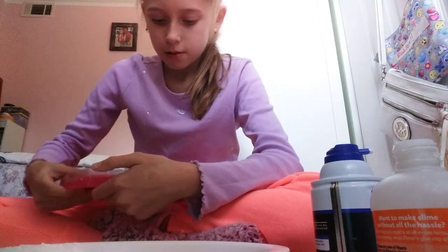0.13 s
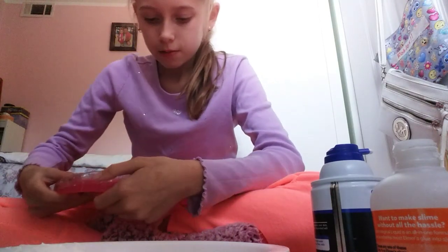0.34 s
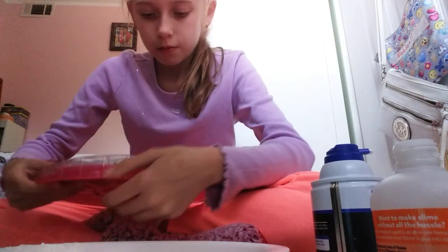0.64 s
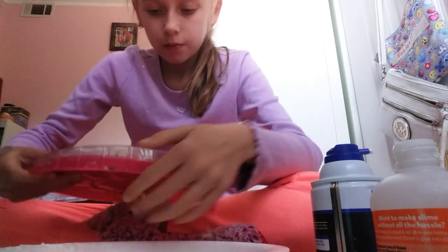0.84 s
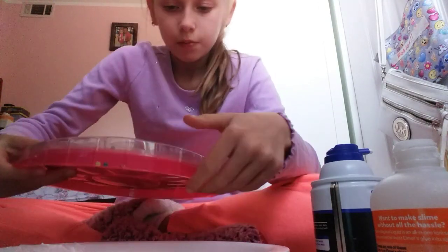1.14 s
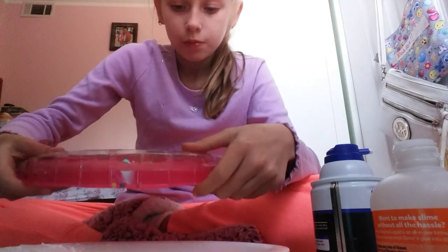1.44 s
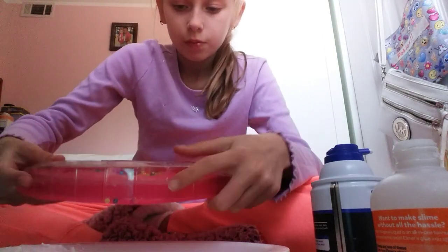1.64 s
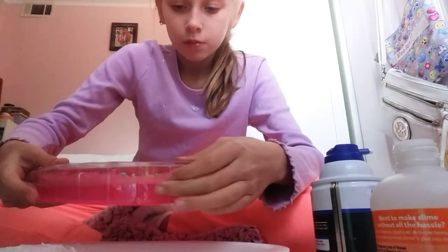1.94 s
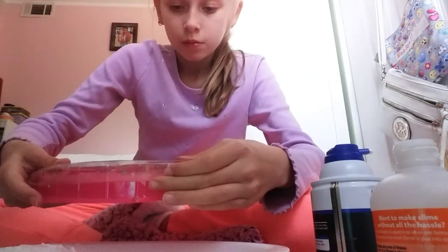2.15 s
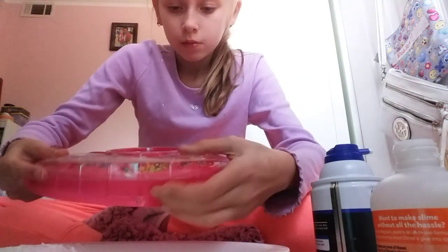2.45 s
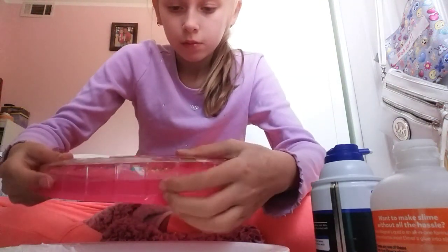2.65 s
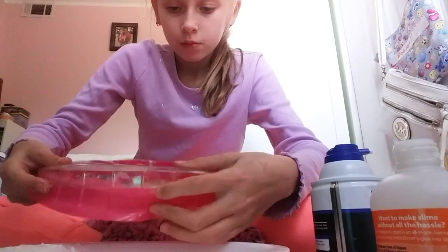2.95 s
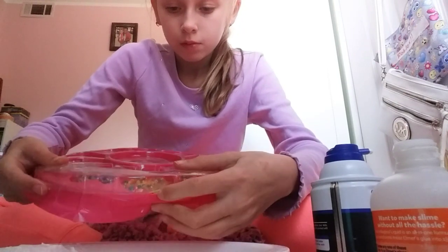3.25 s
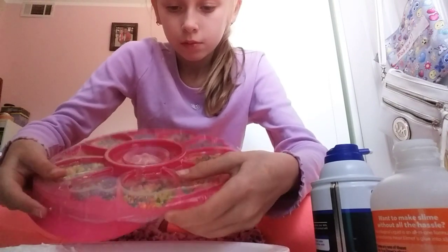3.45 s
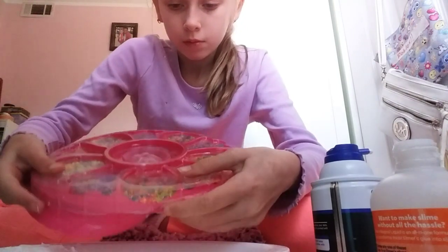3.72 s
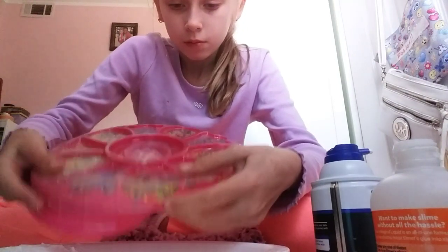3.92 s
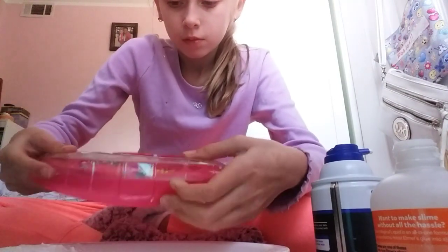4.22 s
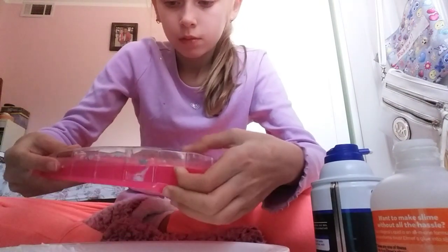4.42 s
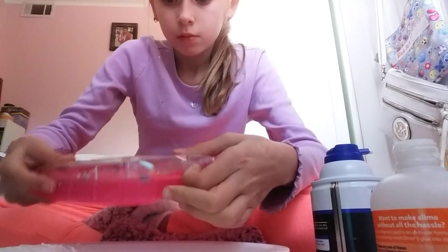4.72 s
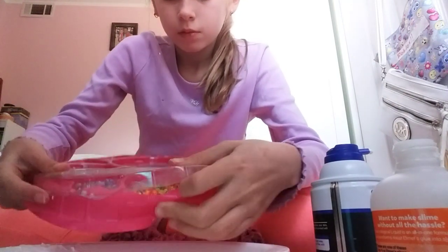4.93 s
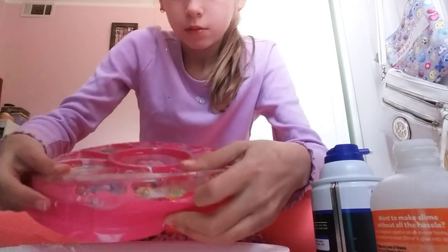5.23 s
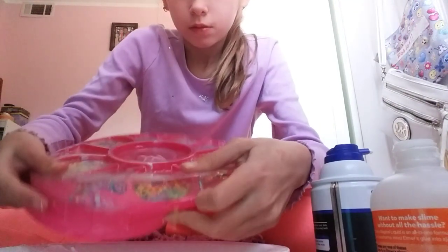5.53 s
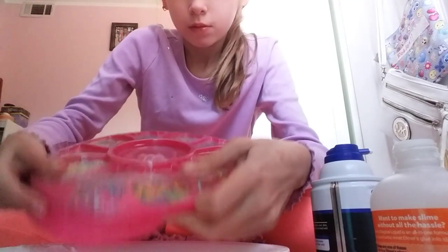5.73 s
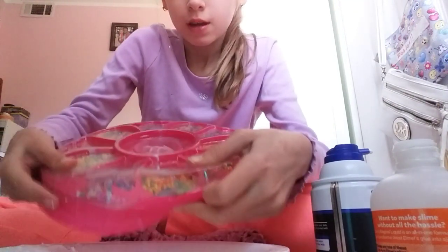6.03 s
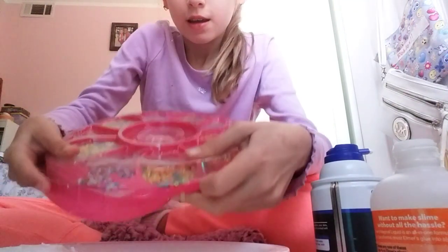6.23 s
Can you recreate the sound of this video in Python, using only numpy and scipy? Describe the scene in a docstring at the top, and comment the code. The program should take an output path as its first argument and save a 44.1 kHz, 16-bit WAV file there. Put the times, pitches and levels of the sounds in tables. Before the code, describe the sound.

Irregular hollow plastic knocks and sharp ticks, pattering craft beads and brief lid creaks, building to one loud snap in a small quiet bedroom.

```python
"""The shell of a round plastic compartment case snaps and creaks as two hands turn, squeeze and tilt it.
Each snap is a chatter of contacts: the contacts excite damped shell modes (body) and noise puffs (tick).
Creaks are stick-slip click trains; small beads patter as random impacts, loose or in heaps; palms thud.
Faint single ticks come from small beads or weak contacts of the case.
A bedroom adds diffuse echoes, and a wavering mains hum with coloured room noise lies below."""
import sys
import numpy as np
from scipy import signal
from scipy.fft import rfft, irfft
from scipy.io import wavfile

SR = 44100
rng = np.random.default_rng(int(sys.argv[2]) if len(sys.argv) > 2 else 0)


def log_audio(samples):
    """Write samples as a 16-bit WAV file to the path given in sys.argv[1]."""
    # one column per channel
    frames = np.atleast_2d(samples).T
    # limit to full scale, then quantise
    limited = np.clip(frames, -1, 1)
    pcm = np.round(limited * 32767).astype(np.int16)
    wavfile.write(sys.argv[1], SR, pcm)


N = 281049

# Hum, with the room noise tied to it, sinking after the loudest snap: (time [s], level [dB])
HUM_LEVEL = [(0, -54.5), (5.02, -54), (5.12, -57), (5.4, -62), (6.37, -62)]
# Spectral shape of the room noise: (frequency [Hz], level [dB])
ROOM_NOISE_SPECTRUM = [(25, -27), (50, 2), (90, 4.5), (160, 3), (300, -3), (640, -14), (1100, -16),
                       (2200, -36), (4000, -26), (8800, -25), (10500, -32.5), (16000, -29)]
# Lowest modes of the hand-damped case: (frequency [Hz], level [dB])
THUD_MODES = [(170, -8), (235, 1.5), (320, 2.5)]
# Modes of the hand-damped shell: (frequency [Hz], level [dB])
BODY_MODES = [(400, -15), (510, -7), (600, -3.5), (650, -0.5), (730, -6), (920, 2), (990, 2.5), (1070, 1.5),
              (1220, 5), (1390, 3), (1520, 1), (1650, -3.5), (1860, -4.5), (2250, -15), (2650, -15)]
# Spectral shape of a dry tick of plastic on plastic: (frequency [Hz], level [dB])
TICK_SPECTRUM = [(1060, -19), (1800, -6), (2010, -10), (2470, -7.5), (3050, -8.5), (3540, -2), (5730, -2),
                 (6230, -3), (7230, -7.5), (8950, 1), (10800, -18), (12700, -8.5), (14900, -10),
                 (15800, 2.5), (16500, -56)]
# Dull thuds of the palms on the base: (time [s], click level [dB])
PALM_THUDS = [(0.095, -46.5), (0.186, -42), (0.206, -46), (0.233, -39), (0.302, -45.5), (1.828, -45.5),
              (1.99, -40), (2.34, -41), (2.48, -34.5), (2.967, -37), (3.409, -44), (4.435, -41.5),
              (4.565, -40), (4.856, -27), (5.016, -39.5)]
# Faint single ticks, from small beads or weak contacts of the case: (time [s], click level [dB])
FAINT_TICKS = [(0.5693, -34.5), (0.62, -48), (0.64, -51), (1.956, -38.5), (2.0492, -45), (2.144, -44.5),
               (2.1657, -42.5), (2.2114, -39), (2.4394, -36), (2.698, -32), (2.757, -30.5), (2.7789, -32),
               (2.7923, -33), (2.8098, -32), (3.026, -29), (3.0458, -35.5), (3.2204, -52), (3.603, -31),
               (3.613, -32.5), (3.627, -30), (3.837, -34), (3.848, -34), (3.9455, -39), (4.8272, -31),
               (5.131, -30), (5.1738, -34), (5.21, -34), (5.2903, -47), (5.526, -29), (5.5613, -33.5),
               (5.612, -45), (5.6713, -41.5), (5.738, -43), (5.845, -29.5), (5.919, -34), (5.9854, -40),
               (6.021, -43), (6.0963, -44), (6.247, -35), (6.281, -35), (6.301, -39), (6.3142, -29),
               (6.348, -34)]
# Heaps of beads sliding at once: (start [s], end [s], body level [dB], bright level [dB])
HEAP_SLIDES = [(0.0, 0.044, -41, -45), (1.722, 1.854, -55, -62), (1.854, 1.876, -40, -43),
               (2.312, 2.357, -52.5, -52.5), (2.483, 2.583, -41.5, -37), (2.641, 2.674, -62, -39),
               (2.93, 3.003, -44, -41), (3.21, 3.24, -61, -74), (4.2, 4.333, -47, -48),
               (4.848, 4.877, -42, -29), (5.016, 5.081, -35.5, -31), (5.378, 5.447, -50, -41.5),
               (5.457, 5.474, -56, -54), (5.504, 5.57, -55, -47), (5.789, 5.859, -54.5, -47),
               (5.92, 5.983, -59.5, -55), (6.177, 6.235, -60, -54), (6.302, 6.346, -59, -50)]
# Loose sliding beads: (time [s], body level [dB], bright patter level [dB])
BEAD_LEVELS = [(0.0, -65, -60.5), (0.2, -45, -44.5), (0.32, -50, -50.5), (0.64, -52.5, -55.5),
               (0.8, -74, -78), (1.12, -74, -76.5), (1.45, -73, -63), (1.65, -76, -76), (1.77, -65, -67),
               (1.92, -55, -62), (2.08, -87, -77), (2.3, -61, -66), (2.55, -46.5, -48), (2.74, -54.5, -56),
               (2.9, -46, -56), (3.07, -103, -93), (3.35, -77, -79), (3.55, -44, -48.5),
               (4.15, -51.5, -46.5), (4.4, -54.5, -56.5), (4.55, -48, -51), (4.68, -54, -64),
               (4.9, -54, -62), (5.13, -49.5, -43.5), (5.22, -65.5, -57.5), (5.34, -62.5, -60),
               (5.6, -66.5, -60), (5.74, -67.5, -60.5), (6.03, -62, -56.5), (6.14, -66.5, -61.5),
               (6.22, -66, -50.5), (6.37, -59, -54)]
# Lid rubbing on its seat:
# (start [s], end [s], first slip rate [1/s], last slip rate [1/s], body click level [dB], bright click level [dB])
LID_CREAKS = [(3.708, 3.808, 376, 159, -49.5, -26.5), (3.878, 3.911, 250, 120, -50, -24.5),
              (4.002, 4.046, 270, 150, -46.5, -24), (4.708, 4.74, 415, 277, -43, -18)]
# Snaps and knocks of the shell:
# (time [s], body peak [dB], body pitch [Hz], tick peak [dB], decay time of the contacts [ms])
SHELL_KNOCKS = [(0.023, -29, 570, -27, 3), (0.095, -26.5, 1270, -25.5, 3), (0.112, -27.5, 1070, -21.5, 6.8),
                (0.16, -19.5, 1400, -24, 3.7), (0.186, -19, 710, -17.5, 2.7), (0.205, -15, 1050, -24, 6.9),
                (0.237, -13.5, 1360, -20, 10.7), (0.301, -24, 1060, -22.5, 6.5),
                (0.341, -28.5, 1080, -22.5, 3.5), (0.376, -30, 1280, -24.5, 5.7),
                (0.411, -33.5, 576, -53, 1.4), (0.445, -31, 1290, -26, 3.7), (0.504, -35, 640, -29.5, 2.2),
                (0.596, -36, 1600, -39, 9.2), (0.825, -43, 1000, -15.5, 2.2), (0.847, -38.5, 593, -55, 2.1),
                (0.891, -36.5, 726, -16, 1.6), (0.956, -46, 1010, -20.5, 2.6), (1.004, -41, 690, -30, 2.5),
                (1.03, -45.5, 1060, -35.5, 6.5), (1.169, -45.5, 1010, -49, 14),
                (1.222, -40.5, 1050, -31.5, 10), (1.256, -35.5, 940, -14, 2.1),
                (1.375, -41.5, 1040, -26, 12), (1.42, -35.5, 1080, -31, 4.7),
                (1.449, -37.5, 1040, -29.5, 5.9), (1.498, -30.5, 1050, -28, 12), (1.568, -42, 918, -34, 5),
                (1.83, -36.5, 630, -53, 5.7), (1.868, -31, 880, -22.5, 4.9), (1.9, -32.5, 1040, -35, 2),
                (1.931, -35.5, 1120, -30.5, 3.8), (1.99, -29, 1400, -31, 6.2), (2.019, -39, 980, -46, 6.4),
                (2.086, -41, 960, -65, 3.5), (2.198, -19, 970, -36.5, 1.4), (2.337, -20.5, 1360, -20, 7.2),
                (2.421, -30.5, 1000, -30.5, 2.6), (2.457, -31.5, 940, -36, 3.3),
                (2.478, -14, 510, -16, 2.3), (2.548, -26.5, 610, -48, 2.3), (2.569, -18.5, 616, -39, 1),
                (2.638, -17.5, 694, -33, 1.6), (2.946, -23.5, 905, -26, 2.3),
                (2.97, -20.5, 700, -21.5, 8.5), (2.98, -25, 610, -16.5, 7.6), (3.088, -39.5, 610, -49, 2.8),
                (3.258, -38, 920, -59, 3.9), (3.3, -23.5, 995, -23.5, 5.3),
                (3.413, -34.5, 614, -27.5, 20.6), (3.473, -34, 964, -50, 2.5), (3.546, -26, 960, -51, 9.3),
                (3.661, -31.5, 950, -44, 2.4), (3.669, -34, 1240, -26, 3), (3.687, -44, 937, -31, 3),
                (3.874, -21.5, 930, -16.5, 2.9), (3.959, -28.5, 1020, -16, 4), (3.974, -31, 1030, -20, 6.1),
                (3.984, -31, 990, -17.5, 16), (3.999, -29, 994, -17, 7.4), (4.064, -30.5, 1420, -20, 4),
                (4.124, -19, 666, -25.5, 2.2), (4.183, -16.5, 670, -14.5, 3.3),
                (4.254, -31.5, 990, -28.5, 5.4), (4.336, -29.5, 950, -40, 1.5),
                (4.435, -26.5, 1100, -38, 4.8), (4.492, -14, 760, -8.5, 0.6), (4.568, -17.5, 760, -11, 3.8),
                (4.746, -27, 1110, -12, 4.1), (4.757, -28, 945, -19, 2.8), (4.768, -31, 1020, -21, 2.2),
                (4.791, -28.5, 1020, -20.5, 2.4), (4.814, -27, 716, -16, 1.5), (4.858, -18, 510, -23, 6),
                (4.866, -10.5, 1040, -28, 3.8), (4.899, -30, 1160, -20, 4.7), (4.914, -33, 1030, -21, 2.7),
                (4.928, -18.5, 1260, -18.5, 9.1), (4.967, -24, 1240, -16, 3.3), (4.986, -20, 1040, -18, 3),
                (5.016, -5, 1430, -6.5, 3.8), (5.267, -42, 1040, -35, 9.7)]

RING_CYCLES = 24  # cycles until a mode has lost 60 dB
TICK_MS, FAINT_TICK_MS, SNAP_MS = 1.1, 2.9, 0.95  # decay times of the noise puffs
HUM_HZ, ROOM_NOISE_UNDER_HUM_DB = 120.3, -5.5
ROOM_T60_S, WALL_CUT_HZ, ROOM_DB = 0.21, 7800, -13.5
FAINT_BODY_DB = -25
SWISH_PER_S, SWISH_EDGE_S = 4000, 0.016  # typical impact rate, edge time
BEADS_PER_S, BEAD_SPREAD_DB = 900, 1.5  # typical impact rate, spread of sizes
CREAK_TOP_DB = -6  # rubbing is duller than a tick
# The more the tick stands above the body, the harder and brighter the contact
EVEN_TICK_HZ, TICK_OCTAVES_PER_DB = 5400, 1.07
EVEN_TOP_DB, TOP_DB_PER_DB = -3.5, 0.46
CASE_LOW_HZ = 120
MIC_TOP_HZ, CUTOFF_HZ = 15450, 16850


def from_db(db):
    """Logarithmic level: decibels become an amplitude gain."""
    return 10 ** (np.asarray(db) / 20)


def rms_one(x):
    """Power normalization: scale to a mean square of one."""
    return x / np.sqrt(np.mean(x ** 2) + 1e-20)


def in_time(rows):
    """Linear interpolation: each level column of a table becomes one value per sample."""
    times, *columns = np.transpose(rows)
    return [np.interp(np.arange(N) / SR, times, column) for column in columns]


def drift(rate_hz):
    """Low-passed randomness: noise through two equal one-pole filters, scaled to spread 1."""
    r = np.exp(-2 * np.pi * rate_hz / SR)
    noise = rng.standard_normal(N + SR)
    settled = signal.lfilter([1], [1, -2 * r, r * r], noise)[SR:]
    return rms_one(settled)


def colour(x, spectrum, extra_db=0):
    """Spectral shaping: filter the last axis by (Hz, dB) rows, with further dB per bin."""
    hz, level_db = np.transpose(spectrum)
    size = x.shape[-1]
    bins = np.fft.rfftfreq(size, 1 / SR) + 1
    gain = from_db(np.interp(np.log(bins), np.log(hz), level_db) + extra_db)
    return irfft(rfft(x) * gain, size)


def near(hz, centre_hz, octaves):
    """Resonant closeness: a bell curve in log frequency, one row per centre."""
    return np.exp(-(np.log2(hz / centre_hz[:, None]) / octaves) ** 2)


def ring(clicks, hz, t60):
    """Damped resonance: a unit click starts a decaying sine of height 1."""
    r = from_db(-60 / (t60 * SR))
    w = 2 * np.pi * hz / SR
    return signal.lfilter([0, np.sin(w)], [1, -2 * r * np.cos(w), r * r], clicks + 1e-18)


def strike(clicks, modes, scatter_db):
    """Modal excitation: each click lands on its own spot, giving each mode its own strength and sign."""
    out = np.zeros(N)
    for hz, level_db in modes:
        strength = from_db(level_db + scatter_db * rng.standard_normal(N))
        spot = strength * rng.choice([-1, 1], N)
        out += ring(clicks * spot, hz, RING_CYCLES / hz)
    return out


def ticks(clicks, ms=TICK_MS):
    """High modal density: thin plastic answers a contact with a puff of noise that dies at once."""
    r = np.exp(-1000 / (ms * SR))
    return signal.lfilter([1], [1, -r], clicks) * rng.standard_normal(clicks.shape)


def clicks_at(rows):
    """Impulsive excitation: one single-sample click per (time, level) row."""
    times, level_db = np.transpose(rows)
    clicks = np.zeros(N)
    clicks[(times * SR).astype(int)] = from_db(level_db)
    return clicks


def patter(per_s, spread_db, body_gain, bright_gain):
    """Random impact process: beads hit the walls by chance, with long-tailed sizes."""
    born = rng.random(N) < per_s / SR
    size_db = spread_db * np.minimum(rng.exponential(1, N), 4)
    clicks = born * from_db(size_db)
    body = rms_one(strike(clicks, BODY_MODES, scatter_db=4.5))
    bright = rms_one(colour(ticks(clicks), TICK_SPECTRUM))
    return body_gain * body + bright_gain * bright


def background():
    """Steady sources: a hum wavering in phase and level, over coloured noise."""
    hum_db, = in_time(HUM_LEVEL)
    phase = 2 * np.pi * HUM_HZ * np.arange(N) / SR + 0.3 * drift(14)
    hum = np.sqrt(2) * np.sin(phase) * from_db(1.0 * drift(4.9))
    noise = rms_one(colour(rng.standard_normal(N), ROOM_NOISE_SPECTRUM))
    return from_db(hum_db) * (hum + from_db(ROOM_NOISE_UNDER_HUM_DB) * noise)


def bedroom(x):
    """Diffuse reverberation: dense echoes as dying noise that starts 4 ms late, dulled by soft furnishings."""
    t = np.arange(SR // 2) / SR
    tail = rng.standard_normal(len(t)) * from_db(-60 * t / ROOM_T60_S) * (t > 0.004)
    tail = signal.sosfilt(signal.butter(1, WALL_CUT_HZ, fs=SR, output="sos"), tail)
    return signal.fftconvolve(x, tail / np.sqrt(np.sum(tail ** 2)))[:N]


def thuds():
    """Soft impact: the lowest modes ring, smoothed as by a push that lacks a sharp edge."""
    modes = strike(clicks_at(PALM_THUDS), THUD_MODES, scatter_db=2.5)
    return signal.lfilter([0.04], [1, -0.96], modes)


def faint_ticks():
    """Weak single contact: one noise puff, with a little of the case ringing after it."""
    clicks = clicks_at(FAINT_TICKS)
    tick = colour(ticks(clicks, FAINT_TICK_MS), TICK_SPECTRUM)
    return tick + from_db(FAINT_BODY_DB) * strike(clicks, BODY_MODES, scatter_db=6.0)


def swishes():
    """Granular flow: a heap sets off quickly and trickles out as a dense run of impacts."""
    body, bright, t = np.zeros(N), np.zeros(N), np.arange(N) / SR
    half_edge = SWISH_EDGE_S / 2
    for start, end, body_db, bright_db in HEAP_SLIDES:
        corners = [start - half_edge, start + half_edge, end - SWISH_EDGE_S, end + SWISH_EDGE_S]
        moving = np.interp(t, corners, [0, 1, 1, 0])
        body += moving * from_db(body_db)
        bright += moving * from_db(bright_db)
    return patter(SWISH_PER_S * from_db(3.0 * drift(60)), 3.8, body, bright)


def beads():
    """Clustered random impacts: loose beads roll in clumps as the impact rate drifts."""
    body_db, bright_db = in_time(BEAD_LEVELS)
    rate = BEADS_PER_S * from_db(3.4 * drift(25))
    return patter(rate, BEAD_SPREAD_DB, from_db(body_db), from_db(bright_db))


def creaks():
    """Stick-slip friction: the lid releases in uneven clicks whose rate glides."""
    body, bright, t = np.zeros(N), np.zeros(N), np.arange(N) / SR
    wobble = from_db(0.8 * drift(80))
    for start, end, first, last, body_db, bright_db in LID_CREAKS:
        rubbing = (t >= start) * (t < end)
        rate = np.interp(t, [start, end], [first, last]) * wobble * rubbing
        slips = np.diff(np.ceil(np.cumsum(rate) / SR), prepend=0)  # one click per cycle of the rate
        slips = slips * from_db(1.5 * rng.standard_normal(N))
        body += slips * from_db(body_db)
        bright += slips * from_db(bright_db)
    # Slips shake much the same spot, so one puff repeats beside the fresh ones
    puff = ticks(1.0 * (np.arange(400) == 0))
    puffs = np.convolve(bright, puff)[:N] + 1.35 * ticks(bright)
    dull_db = CREAK_TOP_DB * np.interp(np.fft.rfftfreq(N, 1 / SR), [5000, 10000], [0, 1])
    return strike(body, BODY_MODES, scatter_db=5.0) + colour(puffs, TICK_SPECTRUM, dull_db)


def contact_chatter(contact_ms, size, lead):
    """Repeated contact: random touches die away after a first, loudest one at sample lead."""
    t = np.arange(size) / SR
    luck = rng.random((len(contact_ms), size))
    decay_s = np.clip(contact_ms, 0.2, 30)[:, None] / 1000
    chatter = (luck < 0.04) * (luck / 0.04) * np.exp(-t / decay_s)
    chatter[:, 0] = 1.37
    return np.roll(chatter, lead, axis=1)


def shell_body(chatter, body_hz, lead):
    """Modal superposition: contacts ring the shell modes, favouring the pitch of the spot that is hit."""
    size = chatter.shape[1]
    t = np.arange(size) / SR
    # A random sign for each contact keeps the body sound even across pitch
    signed = chatter * rng.choice([-1, 1], chatter.shape)
    signed[:, lead] *= 1.4  # the first contact is loudest, so the body starts clearly
    hz, level_db = np.transpose(BODY_MODES)
    scatter, sign, detune = rng.standard_normal((3, len(body_hz), len(hz)))
    gripped_hz = hz * (1 + 0.031 * detune)  # the grip bends the shell and detunes it
    swell = from_db(-60 * t * hz[:, None] / RING_CYCLES) * (1 - np.exp(-t / 0.0009))
    rings = np.sin(2 * np.pi * gripped_hz[..., None] * t) * swell
    share = from_db(level_db + 7.0 * near(hz, body_hz, 0.21) + 1.8 * scatter) * np.sign(sign)
    response = np.sum(share[..., None] * rings, axis=1)
    return irfft(rfft(response, 2 * size) * rfft(signed, 2 * size))[:, :size]


def shell_tick(chatter, hardness_db):
    """Contact stiffness: a harder contact shifts the favoured band up and lifts the treble."""
    bins = np.fft.rfftfreq(chatter.shape[1], 1 / SR) + 1
    # Beyond a few dB of hardness upward the favoured band leaves the audible range
    octaves = TICK_OCTAVES_PER_DB * hardness_db + 0.75 * rng.standard_normal(len(hardness_db))
    tick_hz = EVEN_TICK_HZ * 2 ** octaves
    top_db = EVEN_TOP_DB + TOP_DB_PER_DB * hardness_db
    treble = np.interp(bins, [5000, 9000], [0, 1])
    lean_db = 6.5 * near(bins, tick_hz, 0.39) + top_db[:, None] * treble
    return colour(ticks(chatter, SNAP_MS), TICK_SPECTRUM, lean_db)


def knocks():
    """Impact radiation: one dying chatter of contacts drives both body and tick, each set to its peak."""
    times, body_db, body_hz, tick_db, contact_ms = np.transpose(SHELL_KNOCKS)
    size, lead = 2560, 512  # samples per knock, samples before its first contact
    chatter = contact_chatter(contact_ms, size, lead)
    body = shell_body(chatter, body_hz, lead)
    tick = shell_tick(chatter, np.clip(tick_db - body_db, -15, 30))
    body *= (from_db(body_db) / np.abs(body).max(axis=1))[:, None]
    tick *= (from_db(tick_db) / np.abs(tick).max(axis=1))[:, None]
    out = np.zeros(N + size)
    for start, sound in zip((times * SR).astype(int) - lead, body + tick):
        out[start:start + size] += sound
    return out[:N]


def scene():
    """Superposition: the case, too small to radiate deep bass, in its room over the background."""
    case = thuds() + faint_ticks() + swishes() + beads() + creaks() + knocks()
    case = signal.sosfilt(signal.butter(3, CASE_LOW_HZ, "high", fs=SR, output="sos"), case)
    return (background() + from_db(ROOM_DB) * bedroom(case) + case)[None]


def record(dry):
    """Band limitation: the microphone drops away at the top, then the band is cut."""
    heard = signal.sosfilt(signal.ellip(8, 0.5, 26, MIC_TOP_HZ, fs=SR, output="sos"), dry)
    return signal.sosfilt(signal.cheby2(14, 90, CUTOFF_HZ, fs=SR, output="sos"), heard)


dry = scene()
out = record(dry)
log_audio(out)
```